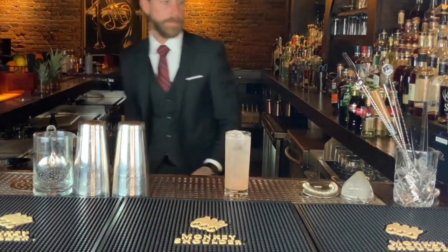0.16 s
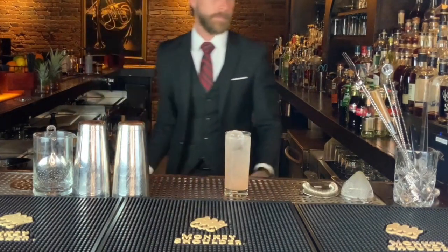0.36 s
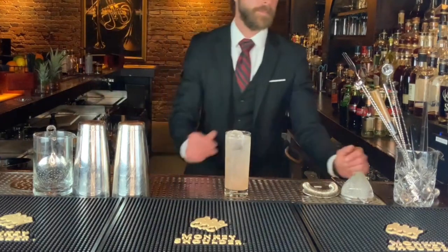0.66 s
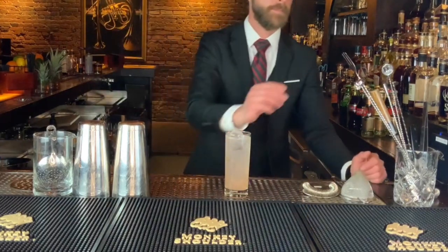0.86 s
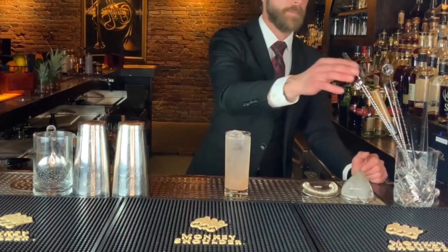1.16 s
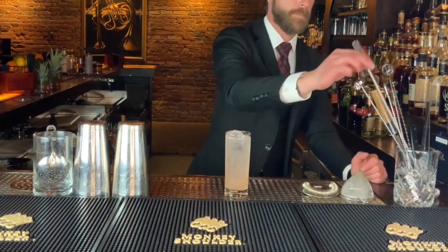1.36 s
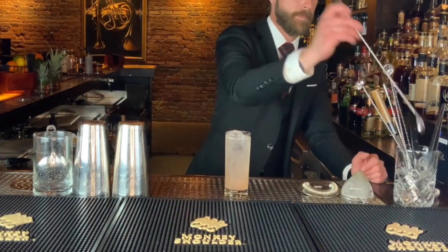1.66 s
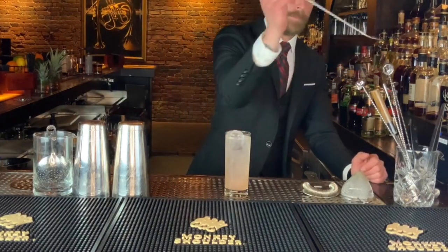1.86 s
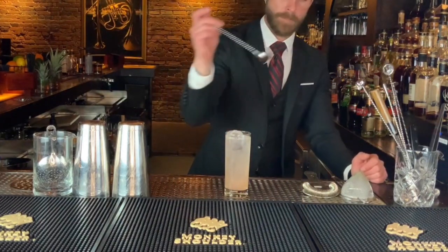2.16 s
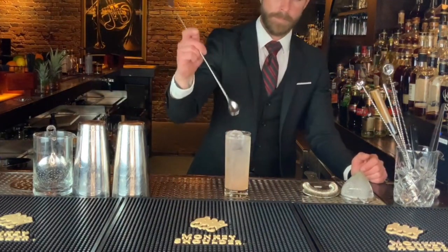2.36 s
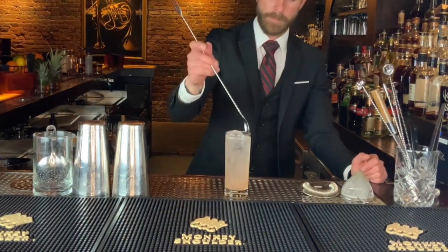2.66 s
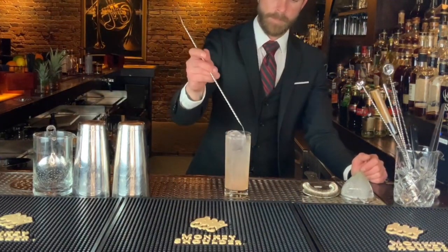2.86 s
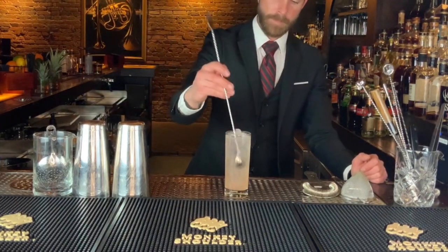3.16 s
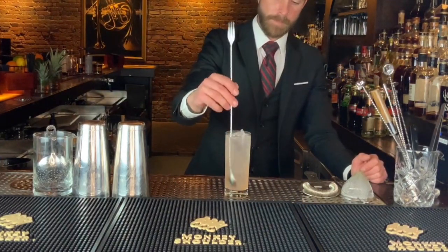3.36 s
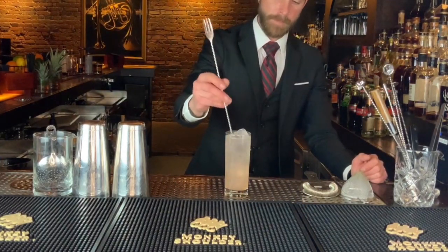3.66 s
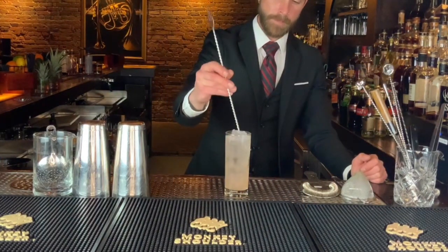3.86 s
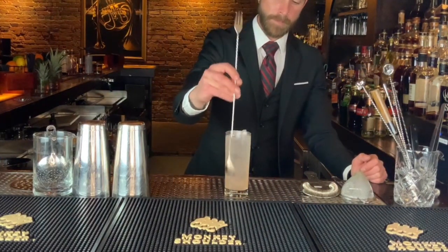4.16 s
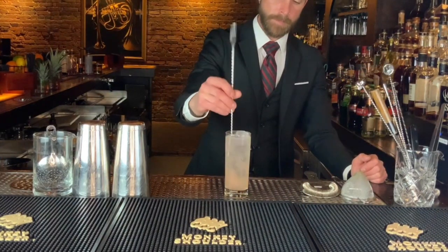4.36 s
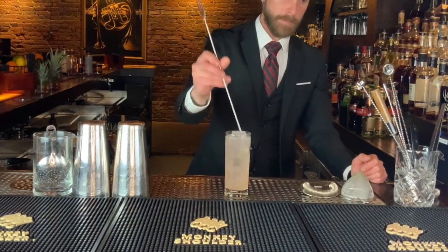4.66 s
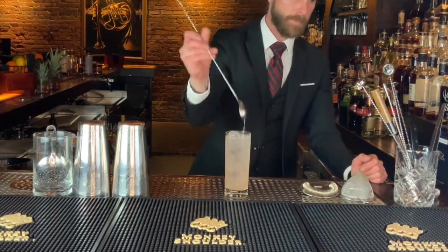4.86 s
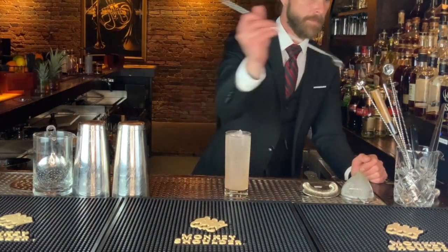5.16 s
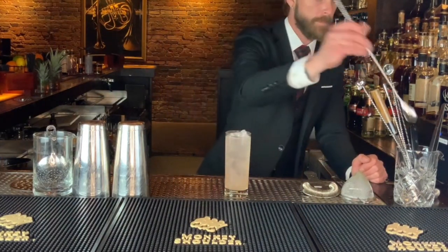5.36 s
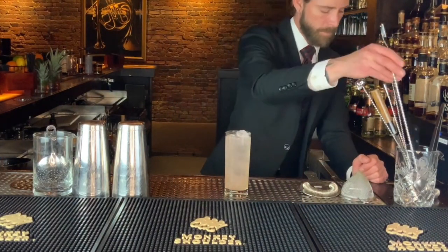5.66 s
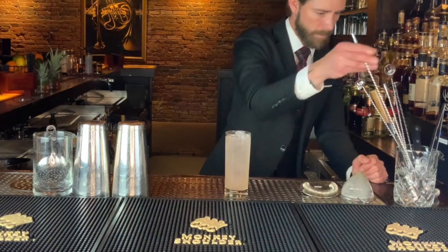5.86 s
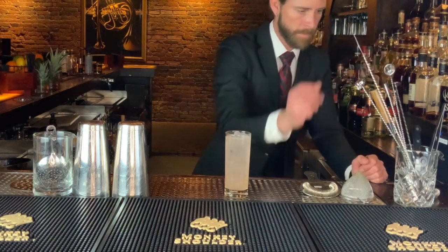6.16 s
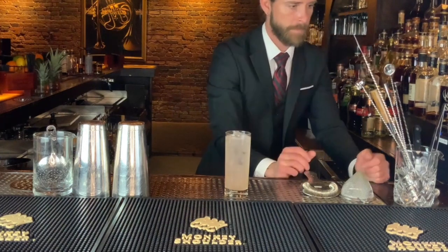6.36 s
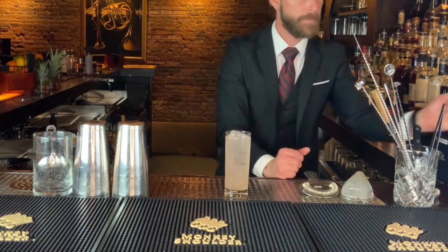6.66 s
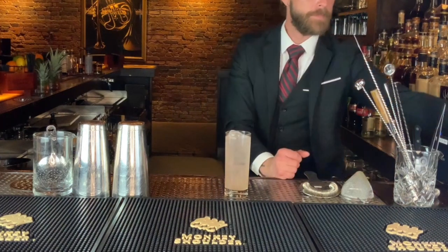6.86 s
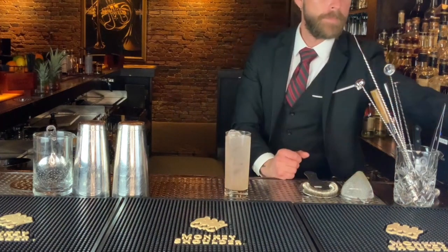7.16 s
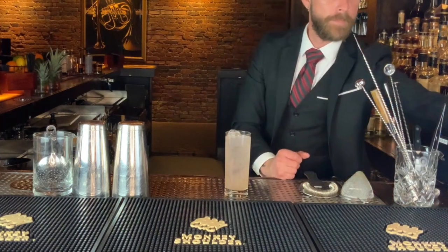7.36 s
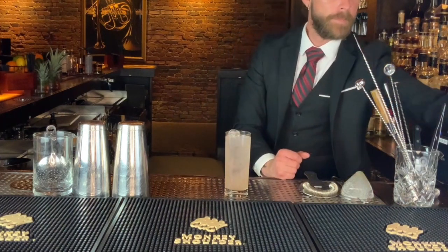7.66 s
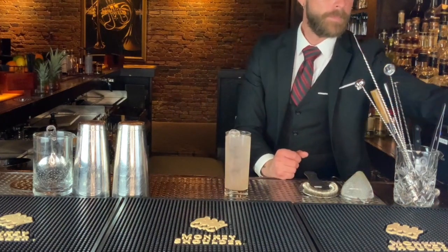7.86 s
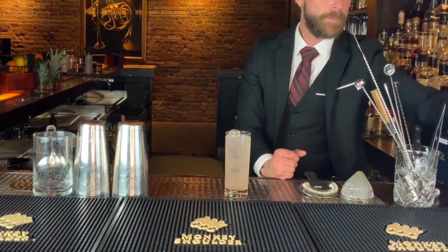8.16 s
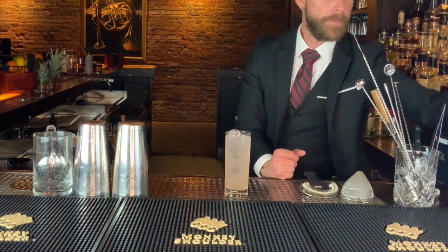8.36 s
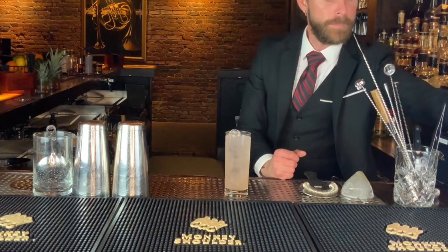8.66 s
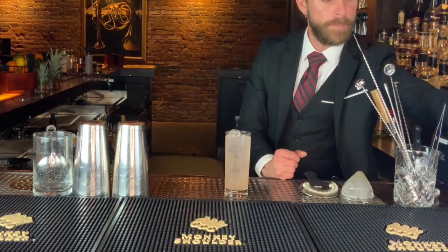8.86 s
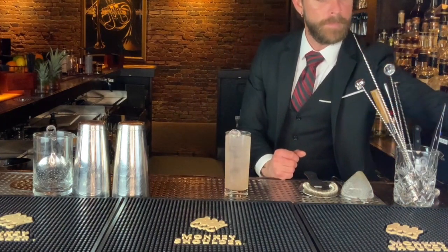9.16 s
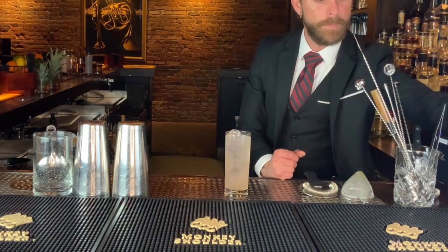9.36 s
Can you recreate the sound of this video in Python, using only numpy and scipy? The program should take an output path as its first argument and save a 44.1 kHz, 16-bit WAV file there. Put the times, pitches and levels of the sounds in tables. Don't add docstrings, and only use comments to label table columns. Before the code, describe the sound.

A long metal spoon rattles out of a jar, stirs cracking ice in a full glass, drops back loudly, then bottles clink over engine drone.

```python
import sys
import numpy as np
from scipy import signal
from scipy.fft import rfft, irfft, next_fast_len
from scipy.io import wavfile

SR = 44100
rng = np.random.default_rng(int(sys.argv[2]) if len(sys.argv) > 2 else 0)


def wav_record(signal):
    frames = np.transpose(np.atleast_2d(signal))
    bounded = np.clip(frames, -1, 1)
    quanta = np.round(bounded * 32767).astype(np.int16)
    wavfile.write(sys.argv[1], SR, quanta)


def gain_from_db(level_db):
    decades = np.asarray(level_db, float) / 20
    return 10 ** decades


N = 419832

# f/Hz, level/dB, t60/s
BOWL_MODES = [(2180, -10, .03), (3700, -19, .015), (4900, -11.5, .01), (5580, -0.5, 0.021), (5770, -3, .02),
              (6740, -1.5, .008), (8740, 1, 0.02), (11130, 0, .04), (12200, -6.5, .015), (12700, 1.5, .025),
              (13600, -2.5, .025), (14450, -0.5, .015), (15400, -5, .02)]


def rms_one(x):
    return x / np.sqrt(np.mean(x ** 2) + 1e-20)


def in_time(rows, fade_s=0.042):
    s, *columns = np.transpose(rows)
    t = np.arange(N) / SR
    opening = t - s[0] + (s[0] == 0)
    closing = s[-1] - t + (s[-1] > 9.5)
    gate = np.clip(np.minimum(opening, closing) / fade_s, 0, 1)
    return [np.interp(t, s, c) for c in columns] + [gate]


def at_hz(points, hz):
    point_hz, value = np.transpose(points)
    return np.interp(np.log(hz), np.log(point_hz), value)


def drift(rate_hz):
    r = np.exp(-80 * np.pi * rate_hz / SR)
    white = rng.standard_normal(N // 40 + 2002)
    slow = signal.lfilter([1], [1, -2 * r, r * r], white)[2000:]
    return np.interp(np.arange(N) / 40, np.arange(len(slow)), rms_one(slow))


def band(x, low_hz, high_hz):
    return signal.sosfilt(signal.butter(2, [low_hz, high_hz], "band", fs=SR, output="sos"), x)


def ring(clicks, hz, t60_s):
    r = gain_from_db(-60 / (max(t60_s, .002) * SR))
    w = 2 * np.pi * hz / SR
    return signal.lfilter([0, np.sin(w)], [1, -2 * r * np.cos(w), r * r], clicks + 1e-18)


def bands(length, likeness):
    edges = 22 * 2 ** np.arange(0, 10, .5)
    white = rng.standard_normal((2, 2, length))
    for k, (low, high) in enumerate(zip(edges, edges[1:])):
        sos = signal.butter(1 + (k > 3), [low, high], "band", fs=SR, output="sos")
        mid, side = signal.sosfilt(sos, white[k % 2])
        hz = np.sqrt(low * high)
        alike = np.clip(at_hz(likeness, hz), 0, 1)
        yield hz, np.sqrt(1 + alike) * mid + np.sqrt(1 - alike) * side * [[1], [-1]]


def diffuse(colour):
    # f/Hz, correlation
    likeness = [(60, 0.99), (200, 0.83), (700, 0.13), (1500, 0.075), (4000, 0.46), (6500, 0.92),
                (15000, 0.98)]
    return rms_one(sum(gain_from_db(at_hz(colour, hz)) * noise for hz, noise in bands(N, likeness)))


def grains(per_s, spread_db):
    sizes = gain_from_db(spread_db * np.minimum(rng.exponential(1, N), 4)) * rng.choice([-1, 1], N)
    return rms_one(sizes * (rng.random(N) < per_s / SR))


def bursts(rows):
    out, t = np.zeros(N), np.arange(4000) / SR
    for s, db, t60 in rows:
        out[round(s * SR):][:len(t)] += rng.standard_normal(len(t)) * gain_from_db(db - 60 * t / max(t60, .002))
    return out


def gesture(s, rise_s, hold_s, db, dying_db_per_s):
    t = np.arange(N) / SR - s
    rise = np.clip(t / max(rise_s, .001), 0, 1) ** 2
    return rise * gain_from_db(db - dying_db_per_s * np.maximum(t - rise_s - hold_s, 0))


def strike(rows, modes, strength_db, vary_db, detune=0., lead=23.0):
    out, (hz, level_db, t60) = np.zeros(N), np.transpose(modes)[:, :, None]
    for i, (s, chatter_s, share) in enumerate(rows):
        luck = rng.standard_normal((2, len(modes), 1))
        t = np.arange(round(np.clip(share * t60.max(), .01, 1) * SR)) / SR
        start_db = level_db + strength_db(hz, i) + vary_db * luck[0]
        decay = gain_from_db(start_db - 60 * t / np.maximum(share * t60, .001))
        blows = rng.standard_normal(2600)[:max(round(chatter_s * SR), 1)] ** 3
        blows *= gain_from_db(np.linspace(0, -6.0, len(blows)))
        blows[0] = lead
        blows /= np.sqrt(np.sum(blows ** 2))
        w = 2 * np.pi * hz * (1 + detune * luck[1])
        fed = np.abs(np.exp(1j * w * np.arange(len(blows)) / SR) @ blows)[:, None]
        modal = np.sum(decay / np.maximum(fed, .4) * np.sin(w * t), axis=0)
        sound = signal.fftconvolve(modal, blows)
        out[round(s * SR):][:len(sound)] += sound
    return out


def pitched(rows, cycles, crack_db):
    out, t = np.zeros(N), np.arange(3000) / SR
    for s, db, hz in rows:
        tone = np.sin(2 * np.pi * hz * t) * gain_from_db(-60 * t * hz / cycles)
        crack = gain_from_db(crack_db) * rng.standard_normal(len(t)) * gain_from_db(-60 * t * hz / cycles * 0.86)
        out[round(s * SR):][:len(t)] += gain_from_db(db) * (tone + crack)
    return out


def engine(rows, orders, octave, unsteady_db):
    hz, first_db, rasp_db, gate = in_time(rows)
    turn = 2 * np.pi * np.cumsum(hz * (1 + 0.0043 * drift(5.3))) / SR
    tones = [(1, first_db), (octave, rasp_db)] + [(k, rasp_db + db) for k, db in orders]
    wave = sum(gain_from_db(db + unsteady_db * drift(19.0)) * np.sin(k * turn + k) for k, db in tones)
    return gate * np.sqrt(2) * wave


def street():
    # t/s, firing f/Hz, firing level/dB, rasp level/dB (octave; carries the upper orders)
    car = [(0.0, 64.8, -44, -73), (1.0, 64.97, -50, -65), (1.43, 75.0, -47.5, -54.5),
           (2.3, 80.9, -48.5, -69), (3.0, 89.6, -55.5, -61), (4.45, 102.4, -62, -56),
           (4.59, 98.5, -52, -61), (5.22, 73.4, -45, -65), (5.4, 63.6, -61, -55)]
    bus_arriving = [(2.75, 55.66, -54.5, -65), (3.55, 58.6, -38.5, -65), (4.07, 62.8, -45, -54.5),
                    (4.48, 63.3, -39.5, -64), (4.74, 58.3, -54.5, -60), (4.94, 58.8, -46, -73),
                    (5.13, 68, -50, -67), (5.46, 61.3, -51, -56.5)]
    bus_waiting = [(5.419, 61.35, -44, -57.5), (6.38, 61.84, -33, -55), (6.72, 59.74, -37.5, -45.5),
                   (6.98, 58.25, -42.5, -45), (7.31, 58.8, -31, -50), (7.8, 58.86, -30, -47),
                   (8.39, 60.6, -51, -49), (8.78, 65, -37.5, -49.5), (8.9, 65.2, -52.5, -70)]
    van = [(8.75, 49.26, -51, -51.5), (9.1, 49.54, -48, -46), (9.52, 50.64, -48.5, -48.5)]
    # multiple of firing f, level over rasp/dB
    car_orders = [(3.3, -9.5)]
    bus_orders = [(4, -6), (2.2, -8.5), (3.5, -7), (5, -15.5)]
    van_orders = [(4, 2.5), (3.3, -5.5), (6, -8.5)]
    low = engine(car, car_orders, 2, unsteady_db=1.5)
    low += sum(engine(rows, bus_orders, 2, unsteady_db=1.45) for rows in (bus_arriving, bus_waiting))
    high = engine(van, van_orders, 1.5, unsteady_db=4.5)
    return low * gain_from_db(np.array([[.05], [-.05]])) + high * gain_from_db(np.array([[.6], [-.6]]))


def air():
    # f/Hz, level/dB per Hz
    colour = [(30, -36), (52, -0.5), (300, -9.5), (600, -18.5), (1500, -26), (3000, -40), (6000, -69),
              (12000, -57)]
    # t/s, level/dB
    swell = [(0.0, -62), (0.72, -64.5), (1.43, -54), (1.83, -65), (6.2, -59), (6.47, -60.5), (8.06, -62.5),
             (8.24, -51), (8.72, -64.5), (9.52, -63)]
    swell_db, _ = in_time(swell)
    level_db = -50.5 + .5 * (swell_db - swell_db.mean())
    return gain_from_db(level_db + .8 * drift(6.9)) * diffuse(colour)


def cooler():
    # f/Hz, width/Hz, level/dB
    hum = (375, 6.5, -59)
    hz, width_hz, db = hum
    return gain_from_db(db) * rms_one(ring(rng.standard_normal(N), hz, 2.68 / width_hz))


def shuffles():
    # t/s, level/dB, rise/s
    scuffs = [(0.079, -51.5, 0.043), (0.859, -55.5, 0.027), (1.16, -41.5, 0.033), (1.418, -42, 0.014),
              (1.55, -46, 0.017), (2.488, -47.5, 0.034), (3.22, -48.5, 0.052), (3.9, -61, 0.056),
              (4.33, -51, 0.011), (4.739, -44, 0.02), (5.28, -55, 0.085), (5.52, -40, .003),
              (5.613, -36, 0.007), (5.906, -38.5, .004), (5.96, -43.5, .049), (6.68, -53, 0.011),
              (6.789, -48.5, 0.022)]
    out, grit = np.zeros(N), grains(5000, spread_db=0.0)
    t = np.arange(SR // 2) / SR
    for s, db, rise_s in scuffs:
        t60_s, top_hz = 0.12 + 7.2 * rise_s, 1600. * np.exp(-rise_s / 0.085)
        fall_db = -60 * np.maximum(t - rise_s, 0) / max(t60_s, .01)
        swell = np.clip(t / max(rise_s, .001), 0, 1) * gain_from_db(db + fall_db)
        noise = grit[round(s * SR):][:len(t)]
        noise = signal.sosfilt(signal.butter(1, [300., top_hz], "band", fs=SR, output="sos"), noise)
        noise = signal.sosfilt(signal.butter(2, 7000., fs=SR, output="sos"), noise)
        out[round(s * SR):][:len(t)] += rms_one(noise) * swell[:len(noise)]
    return out


def jacket():
    # t/s, rise/s, hold/s, level/dB, decay/(dB/s)
    moves = [
        (0.37, 0.13, 0.5, -84, 85),
        (4.998, 0.44, .03, -89, 207),
        (6.195, 0.23, .78, -80.5, 95),
    ]
    # f/Hz, level/dB per Hz
    colour = [(1500, -16), (3000, -5), (6000, -2.5), (10000, 2.5), (14000, -12), (16500, -8)]
    moving = sum(gesture(*row) for row in moves)
    return moving * gain_from_db(16.5 + 1.5 * drift(13.0)) * diffuse(colour)


def knocks():
    # t/s, peak level/dB, f/Hz
    wood_hits = [(1.112, -29, 590), (2.538, -40, 575), (3.873, -36.5, 554), (4.683, -27, 497),
                 (4.746, -32, 1169), (5.308, -36, 506), (6.798, -40, 460), (7.383, -38, 421),
                 (9.175, -43, 980), (9.2, -39, 1183)]
    return band(pitched(wood_hits, cycles=13.0, crack_db=-2.0), 250., 1700.0)


def shafts():
    # t/s, level/dB, extra level of modes under 1500 Hz/dB
    drawn_hits = [(1.175, -52.5, 0), (1.21, -50.5, 0), (1.245, -49.5, 0), (1.28, -55, 0)]
    dropped_hits = [(5.99, -41.5, -8), (6.04, -45.5, -5), (6.075, -52, 12.5)]
    # f/Hz, level/dB, t60/s
    drawn_modes = [(1405, -3, .5), (2089, -6, .4), (2525, -7, .45), (3406, -11, .2), (3600, -5, .18),
                   (4199, -11, .2), (4613, -15, .2), (5500, -10, .1), (5588, -13, .1), (5803, -9, .1),
                   (6530, -13, .1), (7542, -19, .12)]
    dropped_modes = [(1395, -12, .2), (1410, -17, .18), (2540, -9, .25), (2650, -1, .2), (2690, -6, .15),
                     (3580, -8, .14), (4285, -17, .15), (4635, -11, .15), (5593, -10, .1), (5830, -12, .12),
                     (6207, -14, .12), (6508, -14, .12), (7350, -10, .07), (8700, -12, .1)]
    out = np.zeros(N)
    for hits, modes in (drawn_hits, drawn_modes), (dropped_hits, dropped_modes):
        out += strike([(row[0], .035, 1) for row in hits], modes,
                      lambda hz, i: hits[i][1] + 4.6 + hits[i][2] * (hz < 1500), vary_db=2.5, lead=6.7)
    return out


def thin_metal(x):
    return signal.sosfilt(signal.butter(2, 1100., "high", fs=SR, output="sos"), x)


def drags():
    # t/s, hold/s, rattle level/dB, treble over rattle/dB, decay/(dB/s)
    pulls = [
        (1.185, .03, -40.5, -14, 152),
        (1.387, 0.044, -40, -2, 94.5),
        (1.498, 0.079, -43, 10.5, 301.5),
        (5.515, 0.11, -30, -4, 280),
        (5.906, 0.044, -32, -1, 298),
    ]
    out, ticking, rise_s = np.zeros(N), grains(3500, spread_db=4.0), 0.011
    low, high = band(ticking, 2500.0, 12000.0), band(ticking, 9800.0, 11000.0)
    for s, hold_s, db, treble_db, dying in pulls:
        rattle = gesture(s, rise_s, hold_s, db - 1.5, dying)
        treble = gesture(s, rise_s, hold_s, db + treble_db, dying * 1.35)
        for hz, level_db, t60_s in BOWL_MODES:
            drive = ticking * (treble if hz > 9000 else rattle) * gain_from_db(level_db - 28.5)
            out += ring(drive * rng.choice([-1, 1], N), hz, t60_s)
        out += gain_from_db(-6.0) * rattle * low + gain_from_db(-4.0) * treble * high
    return thin_metal(out)


def bowl_hits():
    # t/s, peak level/dB, f/Hz, chatter/s
    hits = [(1.3958, -39, 5920, .015), (1.429, -35, 2200, .01), (1.44, -31.5, 5700, 0.0041),
            (1.4434, -26.5, 5610, .022), (1.512, -31.5, 5430, 0.0096), (1.521, -35, 5600, .015),
            (1.536, -35, 5750, .006), (1.5519, -30, 5560, .012), (1.566, -25.5, 5610, .014),
            (1.579, -28.5, 5700, .014), (1.6045, -32.5, 5650, .014), (1.6377, -37, 2183, .02),
            (1.641, -34, 5500, .022), (5.5214, -15.5, 2200, 0.0039), (5.526, -14, 5600, .008),
            (5.5705, -14, 4900, .012), (5.582, -20, 5650, .014), (5.6091, -24, 5600, 0.0074),
            (5.6186, -18.5, 5640, .024), (5.63, -26, 3750, .02), (5.652, -24, 5200, .012),
            (5.663, -25, 5700, 0.013), (5.908, -26.5, 5600, 0.017), (5.93, -31, 5700, .03),
            (5.9931, -37, 5710, 0.011)]
    rattles = [(s, chatter_s, 1) for s, db, hz, chatter_s in hits]
    out = strike(rattles, BOWL_MODES, lambda hz, i: hits[i][1] - 11, vary_db=3.5, detune=0.015, lead=4.)
    for s, db, hz, chatter_s in hits:
        out += strike([(s, chatter_s, 1)], [(hz, db - 1.5, 90. / hz)], lambda hz, i: 0, vary_db=1, lead=6.)
    cracks = [(s, db - 11.0, 0.025 + 2.7 * chatter_s) for s, db, hz, chatter_s in hits]
    out += band(bursts(cracks), 1700.0, 16000.)
    return thin_metal(out)


def slush():
    # t/s, level/dB
    stirring = [(2.72, -70), (3.16, -56.5), (3.3, -57.5), (3.92, -57), (4.3, -67), (4.8, -60), (4.95, -65)]
    stir_db, gate = in_time(stirring)
    grit = grains(350, spread_db=4.5) * gain_from_db(4.0 * drift(9.0))
    dealt = rng.integers(0, 24, N)
    chip_hz = np.geomspace(2950., 6200., num=24)
    chips = sum(ring(grit * (dealt == k), hz, 52.0 / hz) for k, hz in enumerate(chip_hz))
    grind = rms_one(chips)
    grind = grind + gain_from_db(-8.5) * rms_one(band(grit, 2000.0, 5300.0))
    grind = grind + gain_from_db(0.5) * rms_one(band(grit, 1150.0, 1800.))
    return gate * gain_from_db(stir_db - 2.5) * grind


def ice():
    # t/s, peak level/dB (ice on ice also f/Hz)
    spoon_on_ice = [(2.7378, -33.5), (2.7638, -35), (2.771, -36), (2.779, -33), (2.9466, -32),
                    (3.4462, -29.5), (3.5756, -43), (3.6336, -39), (4.2037, -39.5), (4.2298, -37.5),
                    (4.3151, -36), (4.3328, -22)]
    ice_on_ice = [(2.825, -44, 3430), (2.995, -42, 4100), (3.112, -37, 4700), (3.1206, -38, 3250),
                  (3.128, -36, 3300), (3.218, -40, 3300), (3.24, -42, 3260), (3.1955, -32, 4745),
                  (3.287, -43.5, 4340), (3.533, -38.5, 3280), (3.6083, -44, 3140), (3.6473, -40, 3276),
                  (3.7848, -39, 4410), (3.8124, -32, 4500), (3.8498, -37, 4890), (3.869, -40, 4180),
                  (3.9296, -35.5, 4360), (3.9584, -25.5, 4260), (4.2438, -33.5, 5000), (4.2842, -39, 3464),
                  (4.3815, -43, 3640)]
    ice_on_glass = [(3.0287, -33), (3.0536, -35), (3.0895, -34), (3.3104, -39.5), (3.3457, -44),
                    (3.7129, -53), (3.9001, -49), (3.9174, -46), (4.085, -48), (4.4562, -46), (4.6444, -34),
                    (4.7606, -42), (4.821, -37), (5.0772, -48)]
    # body over peak/dB, treble over peak/dB, grinding t60/s
    spoon_tone = (-13, -8, 0.035)
    ice_tone = (-24, -32, 0.044)
    glass_tone = (-7.5, -54, 0.037)
    # f/Hz, level/dB, t60/s
    glass_modes = [(1263, -7, 0.067), (1540, -0.5, 0.071), (3290, -9, 0.05), (3420, -4.5, 0.01),
                   (4160, -3.5, 0.0147), (4790, -6, 0.012), (5600, -9, 0.0069), (6600, -5, 0.0058),
                   (8540, 2, 0.02), (8790, -16, 0.0042), (11300, -17, 0.0057), (12500, -19, .006),
                   (14800, -4.5, .006)]
    kinds = [(spoon_on_ice, spoon_tone), (ice_on_ice, ice_tone), (ice_on_glass, glass_tone)]
    hits = [(*row[:2], *tone) for rows, tone in kinds for row in rows]

    def strength_db(hz, i):
        _, db, body_db, treble_db, _ = hits[i]
        return db - 12 + (body_db + 5.6) * (hz < 2200) + (treble_db + 4.3) * (hz > 10000)

    touches = [(row[0], t60 / 8, 1) for *row, t60 in hits]
    clinks = strike(touches, glass_modes, strength_db, vary_db=4.0, detune=.06, lead=8.)
    cracks = band(bursts([(s, db - 2.0, t60) for s, db, _, _, t60 in hits]), 1870.0, 6230.0)
    cracks += gain_from_db(-0.5) * pitched(ice_on_ice, cycles=61.0, crack_db=-12.5)
    body_rows = [(s, db + body_db + 2.0, 2.5 * t60) for s, db, body_db, _, t60 in hits]
    edge_rows = [(s, db + treble_db + 6.5, t60) for s, db, _, treble_db, t60 in hits]
    bodies = band(bursts(body_rows), 1126.0, 2370.0)
    edges = band(bursts(edge_rows), 5900.0, 11900.0)
    return clinks + cracks + bodies + edges


def ticks():
    # t/s, peak level/dB, f/Hz
    tick_hits = [(6.5339, -45, 7500), (6.6791, -41, 4860), (7.1319, -54, 6465), (7.4405, -34, 3620)]
    return pitched(tick_hits, cycles=43.0, crack_db=-2.0)


def bottles():
    # t/s, peak level/dB, chatter/s, weight passed to shelf/dB, treble/dB
    hits = [
        (7.4399, -31, 0.003, -30, -6),
        (7.4701, -16.5, .0002, -44, 2),
        (8.0505, -16, 0.005, -18, -4),
        (8.0631, -15, 0.026, -15, -6),
        (8.2182, -8.5, 0.021, -17.5, 1),
        (8.2486, -24, 0.0027, -17, -6),
    ]
    # f/Hz, level/dB, t60/s; slow twins beat, the whistle is a high mode of the first bottle
    bottle = [(1860, -8, 1.3), (3200, -8, 0.3), (3478, -16.5, 1.2), (5820, -2, .55), (6150, -16, 0.2),
              (6200, -22, 1.2), (6492, -9, .65), (7110, -23, 1.0), (7920, -17.5, 0.6)]
    slow_twins = [(3171, -16, 3.0), (3183, -21, 2.2), (5812, -16, 2.0), (5822, -21, 1.5), (1871, -22, 1.2)]
    neighbour = [(1025, -12, 0.04), (1196, -11.5, 0.08), (1289.6, -8, 0.09), (1627, -6, 0.035),
                 (2150, -9, .02), (3173, -6, .065), (3500, -5, 0.05), (3623, -9, .04), (4490, -6, 0.025),
                 (5750, 0, 0.04), (6225, 0, 0.05), (6290, -3, 0.04), (7080, -8, 0.049), (7840, -13, 0.045)]
    thin_top = [(11980, -18.5, 0.087), (12470, -19.5, 0.083), (12920, -28, 0.082), (13160, -24, .12),
                (13400, -28, .1), (15100, -28.5, .07), (15570, -26, .1)]
    whistle = [(10700, -18, .9)]
    shelf = [(364, -6, 0.045), (389.6, -1.5, 0.0804), (523, -4.5, 0.037), (862, -15.5, 0.028)]
    _, db, _, shelf_db, top_db = np.transpose(hits)
    rows = [(s, chatter_s, 0.32 / (1 + chatter_s / 0.0021)) for s, _, chatter_s, *_ in hits]
    held = [(s, chatter_s, 1) for s, chatter_s, _ in rows]
    out = strike(rows, bottle + slow_twins, lambda hz, i: db[i] - 0.5, vary_db=0.5)
    out += strike(held, neighbour, lambda hz, i: db[i] + 0.58 * shelf_db[i] + 3.5, vary_db=1.5)
    cracks = [(s, d - 9, 3000.) for (s, _, _), d in zip(rows, db)]
    out += band(pitched(cracks, cycles=90.0, crack_db=6.5), 450.0, 7500.0)
    out = signal.sosfilt(signal.butter(6, 8200., fs=SR, output="sos"), band(out, 550.0, 13500.))
    top = strike(held, thin_top, lambda hz, i: db[i] + top_db[i] * (1 + 2.5 * (hz > 14000)), vary_db=2.0)
    out += band(top, 11500., 15000.0)
    out += band(strike(rows, whistle, lambda hz, i: db[i], vary_db=0), 10000., 11500.)
    return out + strike(held, shelf, lambda hz, i: db[i] + shelf_db[i], vary_db=5.0)


def room(x):
    # f/Hz, t60/s
    decay = [(200, 0.703), (1000, 0.65), (3000, 0.72), (6000, 0.56), (12000, 0.3)]
    # f/Hz, correlation
    likeness = [(200, .83), (700, .2), (1500, .15), (2500, .4), (4000, .46), (6500, .9), (9500, .98),
                (14000, .6)]
    t = np.arange(SR * 3 // 4) / SR
    noises = bands(len(t), likeness)
    tail = sum(noise * gain_from_db(-60 * t / max(at_hz(decay, hz), .05)) for hz, noise in noises)
    tail = tail * np.clip(t / 0.004, 0, 1)
    return signal.fftconvolve(x[None], tail / np.sqrt(np.sum(tail ** 2) / 2), axes=1)[:, :N]


def scene():
    small = shuffles() + knocks() + ticks()
    near = shafts() + drags() + bowl_hits() + slush() + ice()
    shelf = bottles()
    wet = gain_from_db(-8.0) * near + gain_from_db(-9.0) * shelf + gain_from_db(-1.5) * small
    return near + shelf + small + room(wet) + air() + jacket() + cooler() + street()


def band_limit(x):
    return signal.sosfilt(signal.butter(12, 17000, fs=SR, output="sos"), x)


def record(dry):
    # f/Hz, lead of left/rad
    ports = [(0, 0), (750, .5), (1700, -.9), (3450, -6.1), (7060, -7.7), (9040, -9.3), (10250, -9.55),
             (13700, -12.6)]
    size = next_fast_len(N + 512)
    hz = np.arange(size // 2 + 1) * SR / size
    lead = np.interp(hz, *np.transpose(ports))
    top = gain_from_db(np.interp(hz, [15700, 16300, 17000], [0, -25, -60]))
    turned = irfft(rfft(dry, size) * top * np.exp(.5j * lead * [[1], [-1]]), size)[:, :N]
    mix = turned / (1 + turned ** 4) ** .25
    return band_limit(mix)


dry = scene()
out = record(dry)
wav_record(out)
```